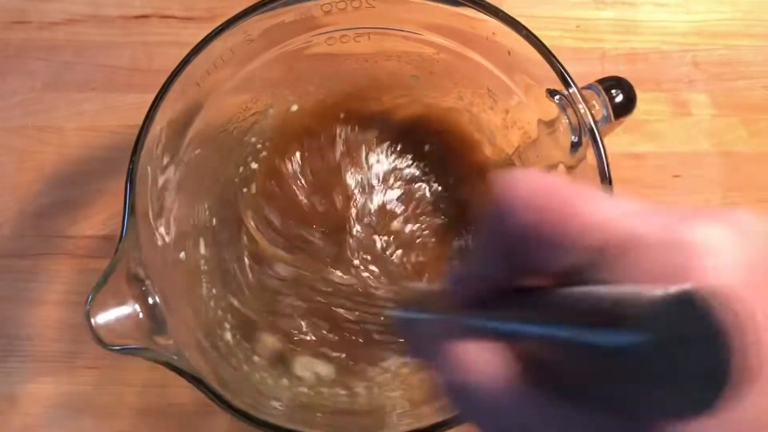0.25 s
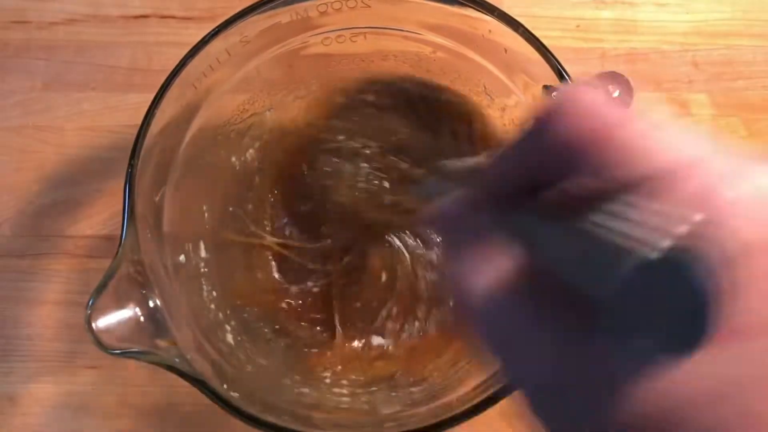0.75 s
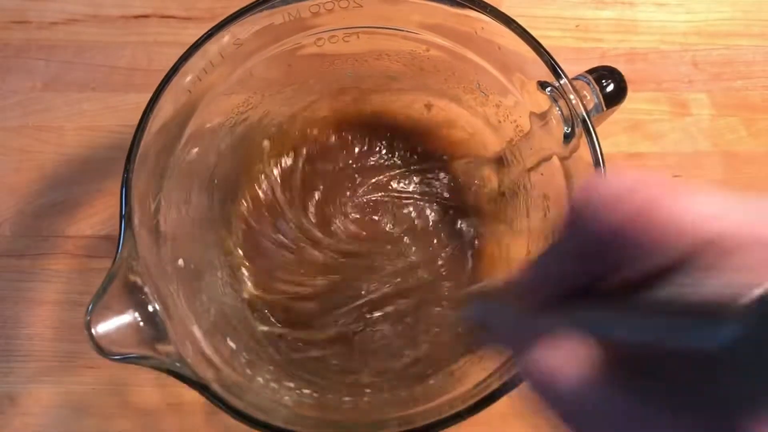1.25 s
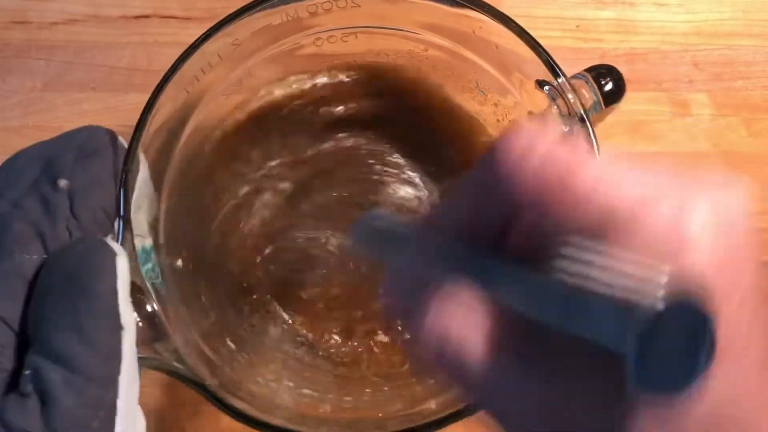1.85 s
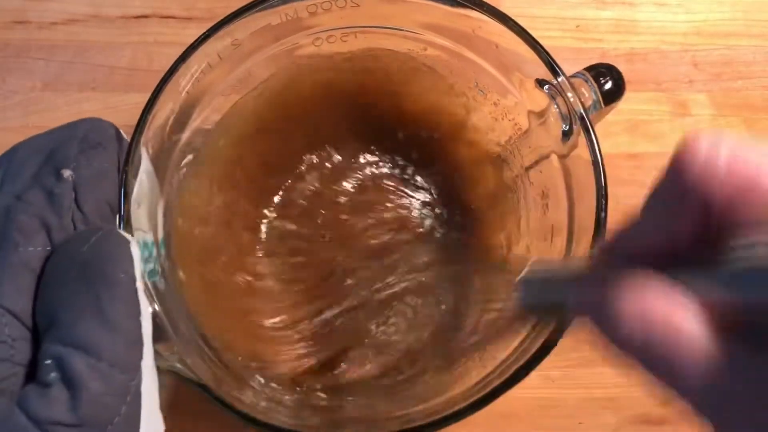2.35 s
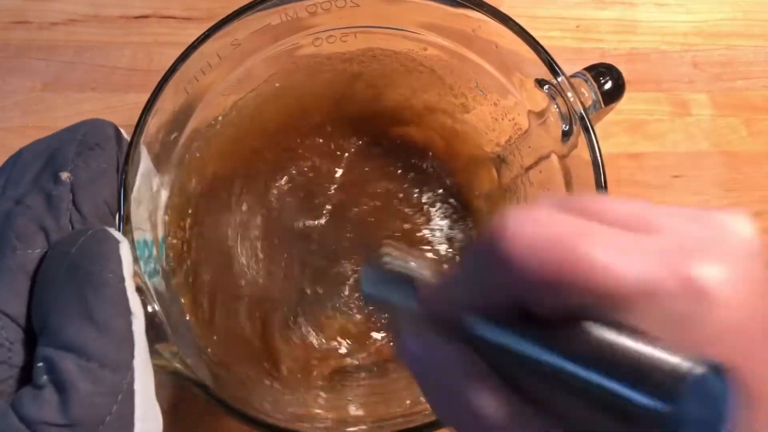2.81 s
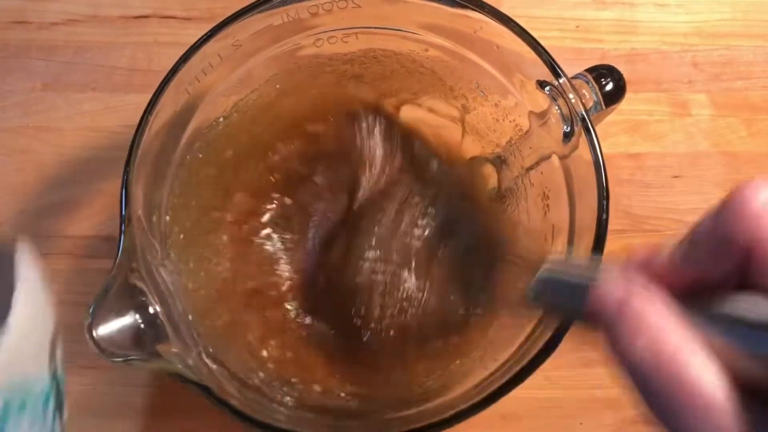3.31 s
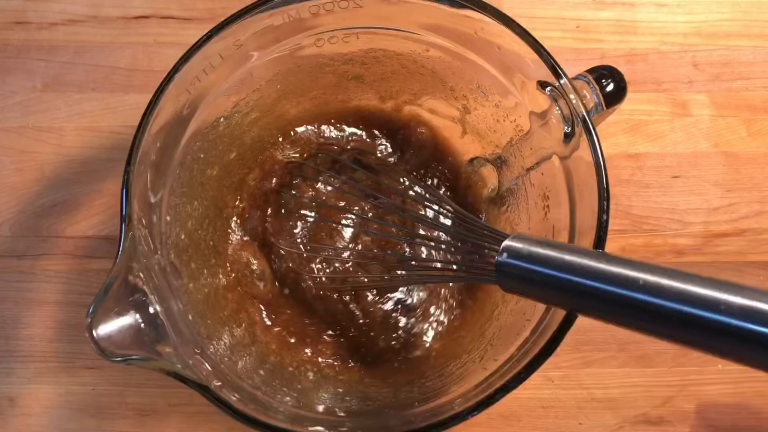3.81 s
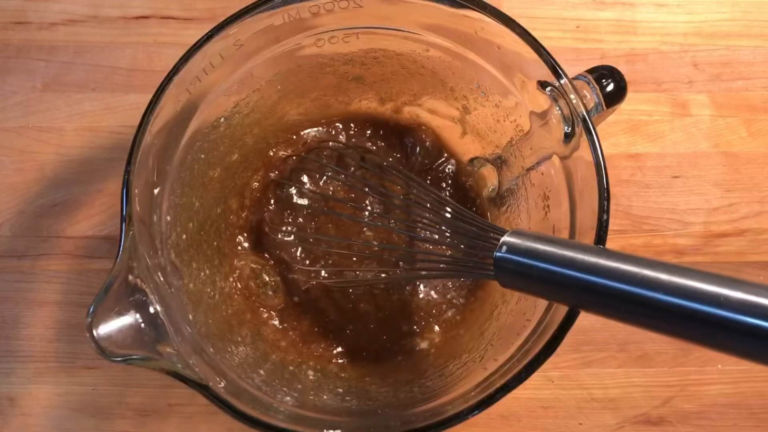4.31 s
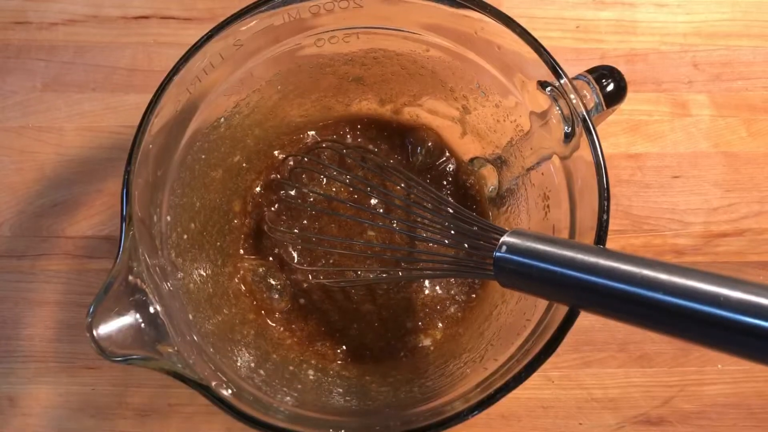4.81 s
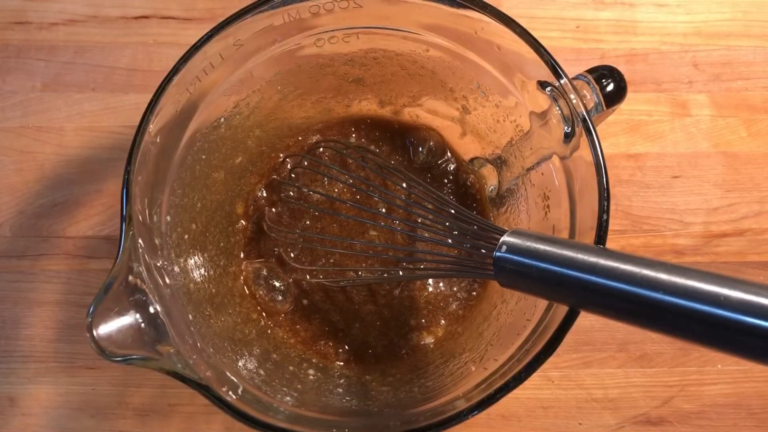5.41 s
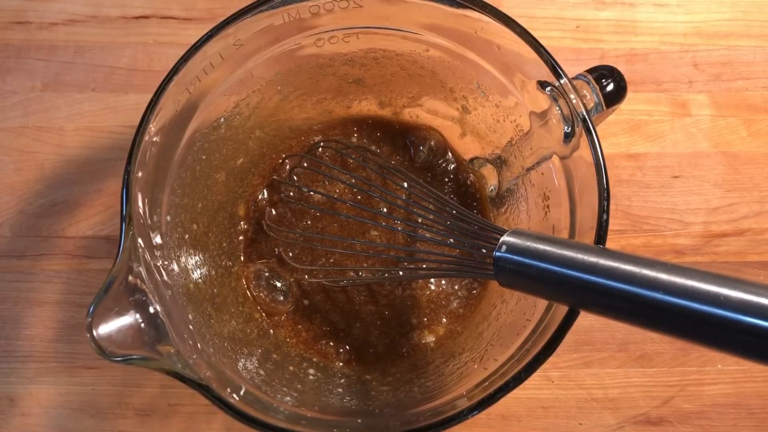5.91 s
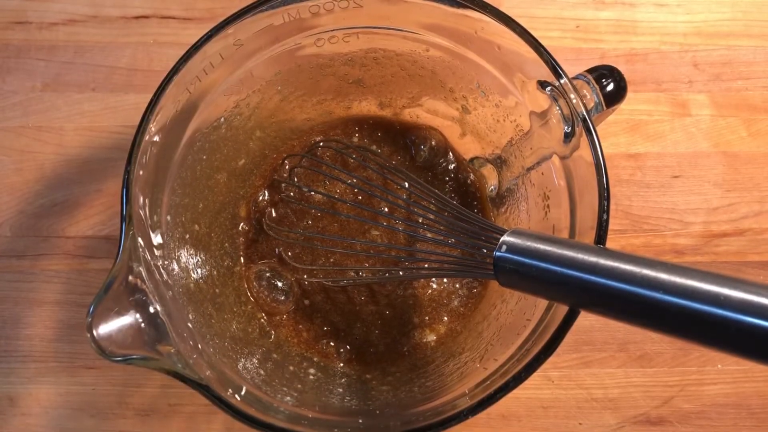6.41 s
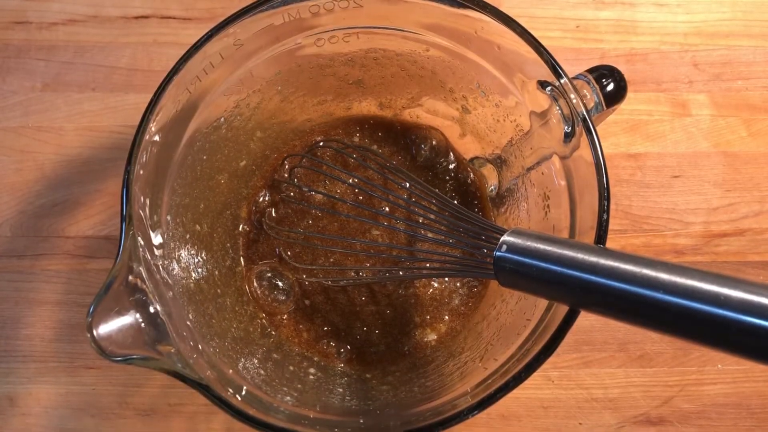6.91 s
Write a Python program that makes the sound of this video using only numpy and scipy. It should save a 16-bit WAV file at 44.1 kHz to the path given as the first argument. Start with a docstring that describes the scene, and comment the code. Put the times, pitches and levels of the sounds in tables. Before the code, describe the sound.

A wire whisk ticks and scrapes in a glass bowl that knocks on a wooden counter, then drops on the rim with a bright crack.

```python
"""Whisk in a glass bowl, quiet kitchen

Close by, a wire whisk beats a runny batter in a glass bowl on a wooden counter. At first the bowl rocks
and slides: bursts of contacts ring wood and glass modes. Held still, it leaves mostly wires that tick and
scrape on the wall: filtered grit, ringing the wires and the wet glass. The whisk drops on the rim with a
bright crack, and its handle bounces, heard through the wood too; then someone moves about further off,
as rustles, shuffles and thuds. Room tone lies below."""
import sys
import numpy as np
from scipy import signal
from scipy.fft import rfft, irfft
from scipy.io import wavfile
from scipy.ndimage import uniform_filter1d

SR = 44100
rng = np.random.default_rng(int(sys.argv[2]) if len(sys.argv) > 2 else 0)


def persist_wave(psi):
    """Save psi, clipped to +-1, as 16-bit WAV."""
    counts = np.round(np.clip(psi, -1, 1) * 32767).astype(np.int16)
    wavfile.write(sys.argv[1], SR, np.atleast_2d(counts).T)


N = 315403   # length in samples

# clear ticks of wire on glass: t/s, level/dB, colour f/Hz
CLINKS = [(.0383, -39, 4000), (.1264, -35.5, 7180), (.148, -33, 5960), (.4008, -34.5, 3500),
          (.5162, -34.5, 10500), (.6587, -39.5, 1580), (.728, -38, 3160), (.8081, -30, 6800),
          (.8774, -39, 2480), (.9245, -36, 6260), (.9772, -34, 6800), (1.2799, -16, 1420), (1.3, -26, 1450),
          (1.4759, -35, 5645), (1.8417, -43, 1573), (1.8576, -32.5, 6700), (1.9785, -37.5, 7100),
          (2.0817, -38, 7100), (2.2094, -33.5, 7660), (2.2513, -35, 6540), (2.3101, -28, 7270),
          (2.3406, -34.5, 7600), (2.3684, -31, 3458), (2.4069, -36, 5840), (2.4718, -40, 6650),
          (2.532, -40, 5730), (2.5806, -36, 5290), (2.6427, -41.5, 2710), (2.7232, -45.5, 6670),
          (2.8025, -41, 4242), (2.8288, -33.5, 11000), (2.8581, -33.5, 5100), (3.0458, -34.5, 4112),
          (3.0855, -45, 1482), (3.1236, -41.5, 7720), (3.2151, -31, 1710), (3.2297, -23, 2760),
          (3.3732, -36.5, 5170), (4.1085, -41.5, 1548), (4.1604, -42.5, 6270), (4.2098, -38.5, 2590),
          (4.2384, -43, 5800)]
# strokes of the wires along the wall: start t/s, length/s, level/dB
STROKES = [(0.035, 0.041, -62), (0.128, 0.1, -53), (0.283, 0.066, -42.5), (0.488, 0.054, -52),
           (0.673, .04, -51), (0.79, 0.087, -49), (0.958, 0.037, -48), (1.095, 0.037, -44.5),
           (1.191, 0.023, -54), (1.285, 0.033, -44), (1.469, 0.058, -53.5), (1.829, 0.18, -52.5),
           (2.078, .025, -58), (2.198, .06, -53), (2.298, .055, -51), (2.418, 0.061, -63),
           (2.527, 0.13, -54.5), (2.78, 0.076, -54.5), (3.038, 0.041, -51.5), (3.204, 0.023, -40.5),
           (3.351, 0.035, -60), (3.583, .1, -60)]
# the wires never quite leave the wall; once dropped the whisk slides down it and stops: t/s, level/dB
SLIDING = [(0, -59), (1.3, -57.5), (1.42, -71), (1.6, -60), (2.0, -70.5), (2.7, -64.5), (2.9, -59.5),
           (3.55, -73), (3.9, -66), (4.12, -53), (4.24, -54), (4.27, -80)]
# colour of wire dragged over glass: f/Hz, relative level/(dB per Hz)
SCRAPE_COLOUR = [(470, -33), (800, -3), (1180, -11.5), (1460, -2.5), (1690, -11), (7290, -7.5), (8570, -13),
                 (15800, -11.5)]
# the dropped handle hits the rim and bounces: t/s, crack peak level/dB, glass ring over crack/dB, chatter/ms
RIM_HITS = [(3.5686, -4.5, -19, 7.4), (3.6896, -30, -6.5, 4.3), (3.814, -48, -13, 1.8)]
# colour of steel on glass: f/Hz, relative level/(dB per Hz)
HANDLE_COLOUR = [(590, -33.5), (1000, -2.5), (1890, -11), (2650, -4), (3010, -20.5), (5970, -12.5),
                 (16000, -23.5)]
# modes of the dry glass bowl: f/Hz, level struck on the wall/dB, level struck at the foot/dB, t60/s
GLASS_MODES = [(545, -9, -18, .3), (592, -7, -16, .35), (1484, 0, -18, .33), (1549, -1, -16, .2),
               (2584, -5, -25, .3), (2645, -6, -22, .25), (3118, -30, -3, .15), (3601, -14, -14, .2),
               (3705, -8, -13, .27), (4090, -13, -18, .13), (4684, -12, -6, .2), (5512, -26, -8, .15),
               (5679, -26, -1, .155), (6110, -17, -24, .18), (6767, -18, -12, .1), (7004, -30, -6, .14),
               (7558, -19, -20, .1), (8080, -26, -30, .15), (8565, -25, -28, .14), (9760, -36, -14, .11),
               (11460, -30, -18, .12), (12850, -32, -22, .1)]
# knocks heard through the wood: the bowl rocking and landing, later the dropped handle bouncing:
# t/s, wood peak level/dB, wood colour f/Hz, crack over wood/dB, contact/ms
KNOCKS = [(0.163, -40, 150, -19, 9.3), (.277, -3, 280, 2, 2.25), (0.451, -20, 380, -14, 13.6),
          (.576, -28, 394, -14, 21), (.681, -27.5, 383, -22, 23.3), (0.796, -23.5, 380, -12.5, 16.6),
          (.83, -22.5, 380, -30, 4.2), (.881, -24, 360, -17.5, 19), (0.999, -25, 366, -19, 20),
          (1.093, -12.5, 300, 1, 8.5), (1.119, -12, 250, -12, 3.5), (1.131, -23.5, 303, 5.5, 6.9),
          (1.17, -11, 353, -8, 9), (1.226, -16.5, 352, -0.5, 5), (1.267, -10.5, 348, -13.5, 8),
          (1.329, 0.5, 285, -11.5, 4.7), (1.66, -35.5, 199, -15, 14), (1.849, -38.5, 129, -40, 54),
          (3.046, -36, 650, -30, 2.6), (3.269, -36.5, 89.97, -27, 18.6), (3.571, -13.5, 800, -33, 4.9),
          (3.63, -12.5, 770, -26, 1.65), (3.644, -25, 152, -34, 11), (3.688, -23.5, 795, -12, 4.3),
          (3.722, -22.5, 800, -37, 1.1), (3.736, -34, 180, -30, 16)]
# bowl rumbling on the wood: t/s, level/dB
RUMBLING = [(0, -57.5), (.29, -51), (.49, -43), (1.1, -41), (1.24, -25.5), (1.42, -44.5), (1.9, -59),
            (3.14, -62.5), (3.22, -51), (3.61, -64), (3.75, -42), (3.9, -57.5), (4.1, -64), (4.4, -84)]
# modes of the wooden counter: f/Hz, level/dB, t60/s
WOOD_MODES = [(70, -19.5, 0.37), (130.4, -2.5, 0.14), (161.5, -5.5, .1), (214, -10.5, 0.075),
              (258, -4, 0.05), (346, 0, 0.023), (379, -5.5, 0.073), (451, -4, 0.019), (636, -3.5, 0.031),
              (725, -5.5, 0.014), (813, -9.5, 0.032), (1000, -15, 0.04), (1420, -8.5, .03)]
# colour of the crack in a knock: f/Hz, relative level/(dB per Hz)
CRACK_COLOUR = [(290, -31.5), (500, -16), (933, -4), (2980, -9.5), (4340, -20), (5710, -20), (6140, -17.5),
                (6900, -26.5), (16000, -31)]
# movements further off: start t/s, length/s, rustle level/dB, shuffle level/dB
MOVES = [(4.496, 0.073, -75.5, -56.5), (4.827, 0.11, -62, -65), (5.424, 0.088, -65.5, -66),
         (5.683, 0.076, -65, -49), (5.901, 0.11, -66, -53), (6.456, 0.11, -62, -53)]
# soft thuds and taps further off: t/s, peak level/dB, colour f/Hz, contact/ms
THUDS = [(4.518, -40.5, 298, 8.1), (4.559, -46.5, 236.6, 24), (4.629, -41, 593, 1.9),
         (4.701, -55, 127.4, 9.4), (4.803, -47, 347, 16), (5.068, -51.5, 1296, 4.3),
         (5.187, -42.5, 702, 4.1), (5.323, -42.5, 795, 4.1), (5.707, -37.5, 382, 11),
         (5.743, -34, 1000, 1.3), (5.745, -40.5, 5030, 31), (5.935, -45, 342, 7.6),
         (6.04, -34.5, 247.4, 6.5), (6.069, -45, 196.7, 16), (6.422, -33.5, 450, 20), (6.471, -39, 150, 17)]
# colour of cloth: f/Hz, relative level/(dB per Hz)
RUSTLE_COLOUR = [(410, -13), (700, -5), (4670, -17), (5840, -14.5), (7010, -19), (15200, -21), (16000, -15)]
# colour of feet: f/Hz, relative level/(dB per Hz)
SHUFFLE_COLOUR = [(18, -57), (30, -19), (55, 2), (123, 2), (322, -4.5), (425, -2.5), (590, -18),
                  (1500, -53.5), (1950, -29.5), (3300, -120)]
# echoes of the kitchen: f/Hz, t60/s
KITCHEN_T60 = [(100, 0.31), (500, 0.51), (2000, 0.37), (6000, 0.047), (14000, 0.032)]
# colour of the room tone: f/Hz, relative level/(dB per Hz)
AIR_COLOUR = [(15, -33.5), (25, 3.5), (123, -1.5), (335, -4.5), (394, 2.5), (677, -5), (911, -14.5),
              (1040, -6.5), (1400, -14.5), (8360, -25.5), (12900, -25.5), (14800, -19), (16000, -23.5)]

# ticks: each chatters, and rings the wall this far below it
CHATTER_MS, WALL_RING_DB = 3.8, -13.5
# light ticks fall anywhere in a stroke: rate, most level over the stroke, colour range
LIGHT_TICKS_PER_S, LIGHT_TICK_DB, LIGHT_TICK_HZ = 38, 13, (1400, 9000)
STROKE_ATTACK_S, STROKE_RELEASE_DB_PER_S = .012, 300.5
WIRES_HZ, WIRES_T60_S = (2800, 15500), .025   # wire loops ring briefly all over this range
WET_WALL = .42           # batter on the wall shortens the ring to this share
RESTING_DAMP_DB = -9     # the handle lying on the rim damps the ring
RISE_SHARE = .45         # a knock swells over this share of its contact time
# glass ring over crack: sharper cracks ring more, longer contacts less
KNOCK_RING_DB, RING_PER_CRACK_DB, RING_LOSS_DB_PER_OCTAVE = -20, 1.2, 1.5
MOVE_ATTACK_S, MOVE_RELEASE_DB_PER_S = 0.034, 85
STILL_RUSTLE_DB, STILL_SHUFFLE_DB = -76, -69.5   # always present, also between movements
NEAR_WET_DB, FAR_WET_DB = -19, -13   # echo level, close and further off
AIR_DB, CUTOFF_HZ = -64, 16450


def whisk():
    """Wires tick one after another on the wall; dragging them is a clumpy run of tiny contacts."""
    start, length, stroke_db = np.transpose(STROKES)
    clinks = list(CLINKS) + light_ticks(start, length, stroke_db)
    ticks = np.zeros(N)
    for s, level_db, hz in clinks:
        chatter = burst(0.043, CHATTER_MS * rng.uniform(.6, 1.1), per_s=11000)
        tick = broad(chatter, hz, octaves=1.0) + .5 * broad(chatter, 11000, octaves=1.3)
        add(ticks, s, from_db(level_db) * tick)

    clumps = from_db(3.5 * rms_one(uniform_filter1d(rng.standard_normal(N), size=300)))
    pressure = in_time(SLIDING)[0]
    pressure = pressure + swells(start, length, stroke_db, STROKE_ATTACK_S, STROKE_RELEASE_DB_PER_S)
    drag = pressure * rms_one(clumps * grit(6000, 3.4, count=N))
    wire_ring = from_db(-5) * wires(drag + .8 * ticks, count=40)
    return ticks + wet_wall(clinks) + colour(drag, SCRAPE_COLOUR) + wire_ring


def light_ticks(start, length, stroke_db):
    """Each stroke scatters small contacts of random time, level and colour along its length."""
    counts = np.ceil(LIGHT_TICKS_PER_S * length).astype(int)
    stroke = np.repeat(np.arange(len(STROKES)), counts)
    when, size, tone = rng.random((len(stroke), 3)).T
    low, high = LIGHT_TICK_HZ
    times = start[stroke] + when * length[stroke]
    levels_db = stroke_db[stroke] + LIGHT_TICK_DB - 8 * size
    return list(zip(times, levels_db, low * (high / low) ** tone))


def wet_wall(clinks):
    """Ticks ring the glass wall, shortened by batter and damped once the handle lies on the rim."""
    s, level_db, colour_hz = np.transpose(clinks)
    hz, wall_db, _, t60 = np.transpose(GLASS_MODES)
    nearness_db = -3.5 * np.abs(np.log2(hz / colour_hz[:, None]))   # modes near a tick's colour answer best
    nearness_db += 14.0 * (hz < 1000)   # springy wires push the lowest wall modes hardest
    ring_db = level_db + WALL_RING_DB + RESTING_DAMP_DB * (s > RIM_HITS[0][0])
    mode_db = ring_db[:, None] + wall_db + nearness_db
    return strike(s, mode_db, zip(hz, WET_WALL * t60), spread_db=4.5)


def wires(force, count):
    """Each short slice of contacts sets one wire loop ringing; power is kept."""
    pitches = np.geomspace(*WIRES_HZ, count) * np.exp(.02 * rng.standard_normal(count))
    dealt = rng.integers(0, count, N // 24 + 1).repeat(24)[:N]   # slices of 24 samples
    out = np.zeros(N)
    for k, hz in enumerate(pitches):
        out += ring(force * (dealt == k), min(hz, .45 * SR), WIRES_T60_S)
    return rms_one(out) * np.sqrt(np.mean(force ** 2))


def handle():
    """Steel on the rim gives a bright crack, then the dry rim rings freely."""
    out = np.zeros(N)
    for s, peak_db, _, chatter_ms in RIM_HITS:
        crack = colour(burst(0.3, chatter_ms, per_s=18000), HANDLE_COLOUR)
        add(out, s, from_db(peak_db) * peak_one(crack))
    s, peak_db, glass_db, _ = np.transpose(RIM_HITS)
    hz, wall_db, _, t60 = np.transpose(GLASS_MODES)
    mode_db = (peak_db + glass_db)[:, None] + wall_db
    return out + strike(s, mode_db, zip(hz, t60), spread_db=1.5)


def knocks_and_sliding():
    """Knocks and the sliding bowl drive the wood modes; each knock also cracks and rings the glass."""
    out = np.zeros(N)
    for s, peak_db, hz, crack_db, contact_ms in KNOCKS:
        rise_ms = RISE_SHARE * contact_ms
        push = np.pad(burst(rise_ms, contact_ms, per_s=6700), (0, 8000))   # room for the ring
        crack = colour(burst(.5 * rise_ms, 2.5 * contact_ms, per_s=14000), CRACK_COLOUR)
        add(out, s, from_db(peak_db) * broad(wood(push), hz, octaves=.8))
        add(out, s, from_db(peak_db + crack_db) * peak_one(crack))
    sliding = in_time(RUMBLING)[0] * rms_one(wood(grit(900, 3.9, count=N)))

    s, peak_db, _, crack_db, contact_ms = np.transpose(KNOCKS)
    glass_db = KNOCK_RING_DB + RING_PER_CRACK_DB * np.clip(crack_db, -12, 0)
    glass_db = glass_db - RING_LOSS_DB_PER_OCTAVE * np.log2(contact_ms / 3)
    hz, _, foot_db, t60 = np.transpose(GLASS_MODES)
    mode_db = (peak_db + crack_db + glass_db)[:, None] + foot_db
    return out + sliding + strike(s, mode_db, zip(hz, t60), spread_db=2.0)


def wood(force):
    """The counter answers a force with the sum of its ringing modes."""
    return sum(from_db(db) * ring(force, hz, t60) for hz, db, t60 in WOOD_MODES)


def further_off():
    """Cloth rustles and feet shuffle as coloured grit; things set down thud as short bursts."""
    start, length, rustle_db, shuffle_db = np.transpose(MOVES)
    rustle = swells(start, length, rustle_db, MOVE_ATTACK_S, MOVE_RELEASE_DB_PER_S)
    shuffle = swells(start, length, shuffle_db, MOVE_ATTACK_S, MOVE_RELEASE_DB_PER_S)
    cloth = colour(grit(8000, 4.4, count=N), RUSTLE_COLOUR)
    feet = colour(grit(1500, 3.2, count=N), SHUFFLE_COLOUR)
    out = (from_db(STILL_RUSTLE_DB) + rustle) * cloth + (from_db(STILL_SHUFFLE_DB) + shuffle) * feet
    for s, peak_db, hz, contact_ms in THUDS:
        octaves = .7 if hz > 400 else .35   # heavy things boom on one note
        thud = broad(burst(0.37, contact_ms, per_s=2600), hz, octaves)
        first_touch = broad(burst(0.102, 2.5, per_s=7400), 1700, octaves=1.05)
        add(out, s, from_db(peak_db) * thud)
        add(out, s, from_db(peak_db - 15) * first_touch)
    return out


def kitchen(x):
    """Diffuse echoes that build up over some milliseconds; each octave dies at its own rate."""
    t, tail = np.arange(SR // 2) / SR, 0
    table_hz, table_t60 = np.transpose(KITCHEN_T60)
    for hz in 45 * 2 ** np.arange(9):
        t60 = np.interp(np.log(hz), np.log(table_hz), table_t60)
        band = signal.butter(2, [hz, min(2 * hz, .45 * SR)], "band", fs=SR, output="sos")
        tail = tail + signal.sosfilt(band, rng.standard_normal(len(t))) * from_db(-60 * t / t60)
    tail = tail * (1 - np.exp(-(t / 0.0065) ** 2))
    return signal.oaconvolve(x, tail / np.sqrt(np.sum(tail ** 2)))[:N]


def room_tone():
    """Steady coloured noise of the quiet room."""
    return from_db(AIR_DB) * colour(rng.standard_normal(N), AIR_COLOUR)


def strike(times, mode_db, modes, spread_db):
    """Blows (rows) stir the modes (columns); each lands elsewhere, so the strengths scatter."""
    at, out = (np.array(times) * SR).round().astype(int), np.zeros(N)
    gains = from_db(mode_db + spread_db * rng.standard_normal(mode_db.shape))
    span = min(N, at.max() + SR // 2)   # the last ring has died by then
    for (hz, t60), gain in zip(modes, gains.T):
        clicks = np.zeros(span)
        clicks[at] = gain
        out[:span] += ring(clicks, hz, t60)
    return out


def ring(force, hz, t60):
    """A two-pole resonator: a unit click starts a decaying sine of height 1."""
    r, w = from_db(-60 / (t60 * SR)), 2 * np.pi * hz / SR
    return signal.lfilter([0, np.sin(w)], [1, -2 * r * np.cos(w), r * r], force + 1e-18)


def burst(rise_ms, fall_ms, per_s):
    """One blow: a cluster of contacts that swells and dies; energy 1."""
    ms = np.arange(4000) * 1000 / SR
    rise, fall = max(rise_ms, .05), max(fall_ms, .1)
    envelope = (1 - np.exp(-ms / rise)) ** 2 * np.exp(-ms / fall)
    x = grit(per_s, 1.8, count=4000) * envelope
    return x / np.sqrt(np.sum(x ** 2) + 1e-20)


def grit(per_s, spread_db, count):
    """Random contacts of uneven size and either sign, rms 1."""
    sizes = from_db(spread_db * np.minimum(rng.exponential(1, count), 4))
    sizes = sizes * rng.choice([-1, 1], count)
    return rms_one(sizes * (rng.random(count) < per_s / SR))


def swells(starts, lengths, levels_db, attack_s, release_db_per_s):
    """Gain per sample: each swell rises, holds and dies away; the loudest counts."""
    t = np.arange(N) / SR - np.array(starts)[:, None]
    fall_db = release_db_per_s * np.clip(t - np.array(lengths)[:, None], 0, None)
    gains = np.clip(t / attack_s, 0, 1) * from_db(np.array(levels_db)[:, None] - fall_db)
    return np.max(gains, axis=0)


def in_time(rows):
    """Level columns as gains per sample, silent outside the table."""
    s, *columns = np.transpose(rows)
    t = np.arange(N) / SR
    return [from_db(np.interp(t, s, c, left=-200, right=-200)) for c in columns]


def colour(x, spectrum):
    """Causal (minimum-phase) filter that passes white noise at unit power."""
    hz, level_db = np.transpose(spectrum)
    grid_hz = np.linspace(1, SR / 2, 4097)
    log_gain = np.interp(np.log(grid_hz), np.log(hz), level_db) * np.log(10) / 20
    cepstrum = irfft(log_gain)
    cepstrum[1:4096] *= 2    # fold the cepstrum forward in time
    cepstrum[4097:] = 0
    taps = irfft(np.exp(rfft(cepstrum)))
    return signal.oaconvolve(x, taps / np.sqrt(np.sum(taps ** 2)))[:N]


def broad(x, hz, octaves):
    """Broad band reaching this many octaves either side of hz, peak 1."""
    edges = np.clip(hz * 2 ** np.array([-octaves, octaves]), 20, .45 * SR)
    return peak_one(signal.sosfilt(signal.butter(2, edges, "band", fs=SR, output="sos"), x))


def add(track, s, x):
    """Mix x into the track from second s."""
    at = round(s * SR)
    track[at:at + len(x)] += x[:N - at]


def from_db(db):
    """Decibels to gain."""
    return 10 ** (np.asarray(db) / 20)


def rms_one(x):
    """Scale to unit rms."""
    return x / np.sqrt(np.mean(x ** 2) + 1e-20)


def peak_one(x):
    """Scale to unit peak."""
    return x / np.max(np.abs(x))


def scene():
    """Whisk, handle and knocks close by, the rest further off and wetter, over the room tone."""
    near = whisk() + handle() + knocks_and_sliding()
    far = further_off()
    echoes = kitchen(from_db(NEAR_WET_DB) * near + from_db(FAR_WET_DB) * far)
    return (near + far + echoes + room_tone())[None]


def record(dry):
    """The microphone rolls off the deep bass, peaks are rounded, the top is cut."""
    low_cut = signal.butter(4, 44, "high", fs=SR, output="sos")
    top_cut = signal.cheby2(16, 60, CUTOFF_HZ, fs=SR, output="sos")
    rounded = 1.4 * np.tanh(signal.sosfilt(low_cut, dry) / 1.4)
    return signal.sosfilt(top_cut, rounded)


dry = scene()
out = record(dry)
persist_wave(out)
```